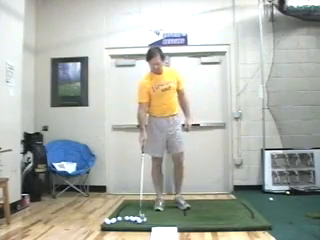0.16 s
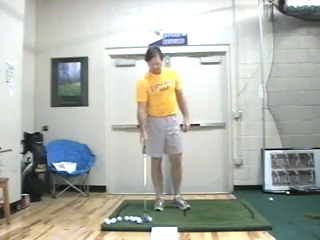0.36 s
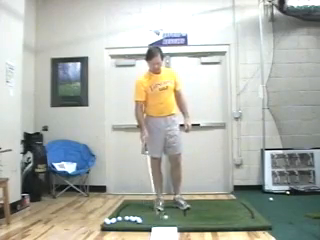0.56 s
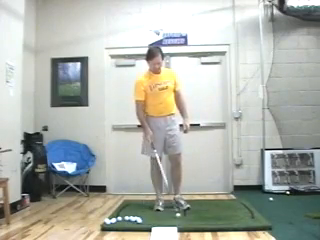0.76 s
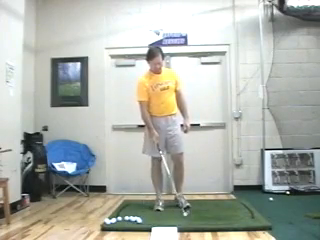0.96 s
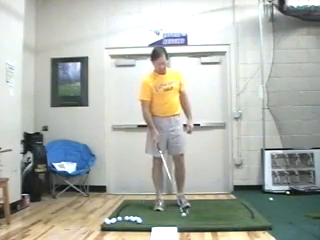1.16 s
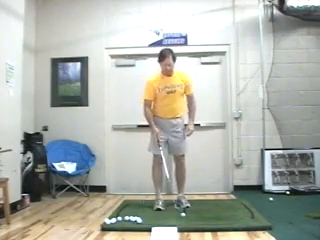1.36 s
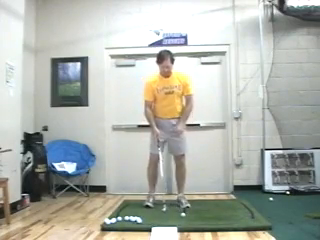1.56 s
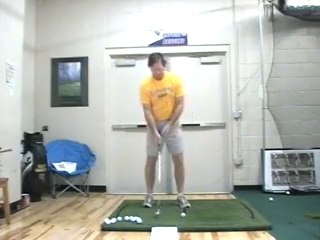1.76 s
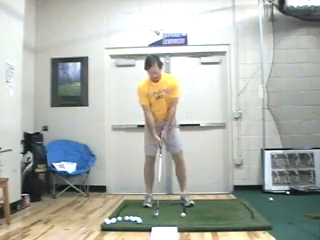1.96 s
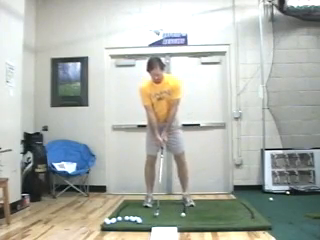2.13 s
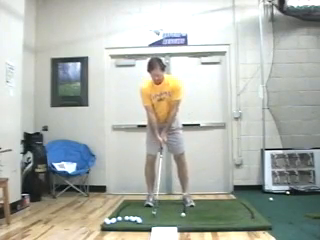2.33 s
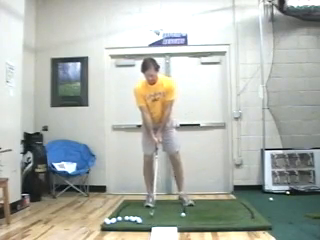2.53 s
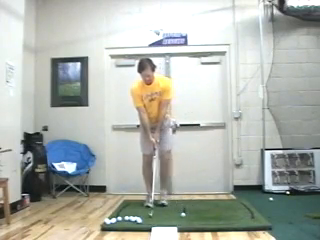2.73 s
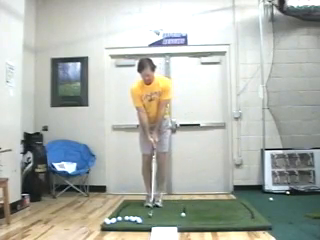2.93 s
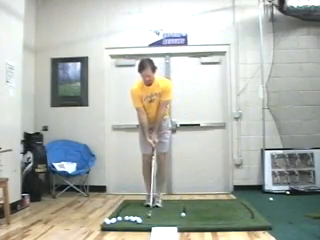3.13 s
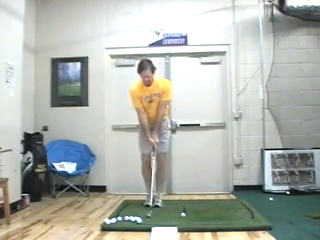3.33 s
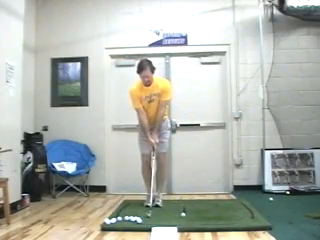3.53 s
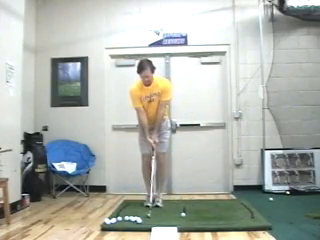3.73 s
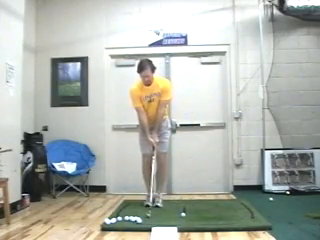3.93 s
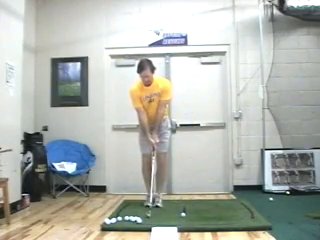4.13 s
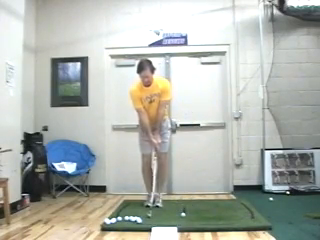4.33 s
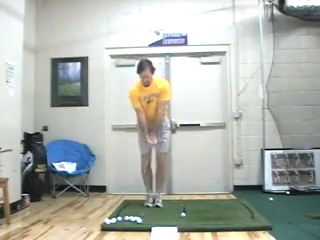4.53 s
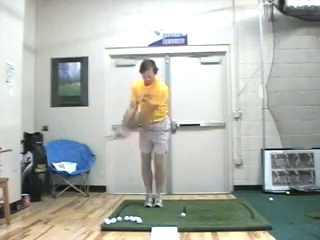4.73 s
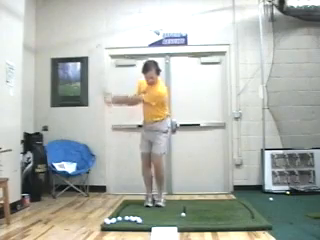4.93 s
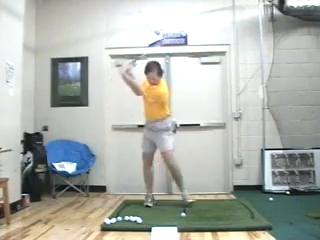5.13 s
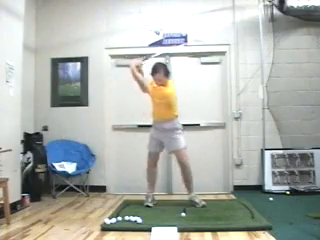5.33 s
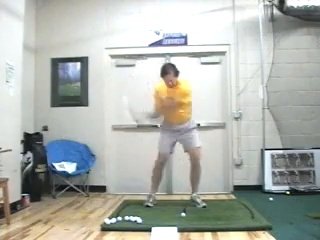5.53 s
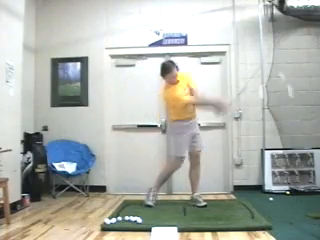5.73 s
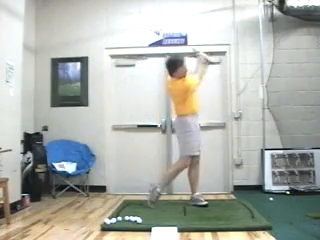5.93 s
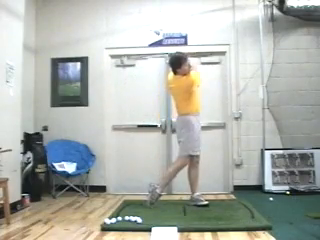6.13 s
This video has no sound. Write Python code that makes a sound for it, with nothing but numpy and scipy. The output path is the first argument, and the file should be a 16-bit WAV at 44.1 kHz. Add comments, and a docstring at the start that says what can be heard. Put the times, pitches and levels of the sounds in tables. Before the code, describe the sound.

A steady mains buzz and soft fan air fill a small hard-walled room. A few barely audible, gritty shoe and club touches on a mat come early, then only hum. Near the end a very brief swish leads into one loud, sharp golf crack with a metallic ring and quick echoes, followed by a low thud as the ball meets a net and a grainy rustle. Heard from a few metres away, nearly mono.

```python
"""A small hard-walled room with buzzing lamps and a fan, where a golfer hits one ball off a mat into a net.
Shoes and club tap the mat; the shaft sings and the head hisses on the way down; filtered noise bursts make
the crack, ringing sines the club, low sines the thuds; slow-dying grainy noise makes the net's rustle.
A tape camera with a narrow stereo microphone listens from a few metres away."""
import sys
import numpy as np
from scipy import signal
from scipy.fft import rfft, irfft, dct
from scipy.io import wavfile

SR = 44100
rng = np.random.default_rng(int(sys.argv[2]) if len(sys.argv) > 2 else 0)


def inscribe(sig):
    """Save sig as 16-bit PCM at rate SR to the path in sys.argv[1].

    A 1-D sig is mono; a 2-D sig holds one channel per row.
    Samples are clipped to [-1, 1] before scaling.
    """
    pcm = np.round(np.clip(np.atleast_2d(sig).T, -1, 1) * 32767)
    wavfile.write(sys.argv[1], SR, pcm.astype(np.int16))


N = 272538
T = np.arange(N) / SR  # time, s
STRIKE_S = 5.7472  # the face meets the ball

# colour of the crack and its early echoes: f/Hz, relative level per Hz/dB
CRACK_COLOUR = [(30, -25), (150, 5), (500, 2.5), (1100, -2.5), (2200, 7), (4200, -3.5), (7200, 2.5),
                (9200, -3), (11000, -15), (12500, -27)]


def undb(db):
    """Decibels to gain."""
    return 10 ** (np.asarray(db) / 20)


def unit(x):
    """Scale to rms 1."""
    return x / np.sqrt(np.mean(x ** 2))


def colour(x, points):
    """Filter by a spectrum of (Hz, dB) points, joined by straight lines over log frequency."""
    hz, db = np.transpose(points)
    f = np.maximum(np.arange(N) * SR / (2 * N), 1)
    gain = undb(np.interp(np.log(f), np.log(hz), db))
    return dct(dct(x, norm="ortho") * gain, type=3, norm="ortho")


def noise(points):
    """Unrelated mid and side noises of one colour, together of rms 1."""
    return unit(colour(rng.standard_normal((2, N)), points))


def walk(rate):
    """Smooth random curve of rms 1 with about `rate` turns a second."""
    f = np.fft.rfftfreq(N, 1 / SR)
    return unit(irfft(rfft(rng.standard_normal(N)) / (1 + (f / rate) ** 4), N))


def blow(start, rise, t60):
    """Envelope that rises at `start` and dies away by 60 dB in `t60` seconds."""
    age = np.maximum(T - start, 0)
    return (1 - np.exp(-age / rise)) * np.exp(-np.log(1000) * age / t60)


def tone(hz):
    """A sine of rms 1 with random phases in mid and side."""
    return np.sqrt(2) * np.sin(2 * np.pi * (hz * T + rng.random((2, 1))))


def strike(crack_db=-1, crack_t60=.012, brush_db=-2, brush_lead=0.0028, ring_db=-5):
    """The sole brushes the mat, then the face cracks on the ball; floor and walls repeat it and the club rings."""
    # the crack and its first reflections: delay/s, level before crack_db/dB
    paths = [(0, 4), (.0026, 1.5), (.0068, -7), (0.0117, -9), (0.0172, -18), (.034, -8.5), (.047, -17)]
    # modes of club head and shaft: f/Hz, level before ring_db/dB, t60/s
    club = [(1135, -17.5, 0.15), (1433, -36, 0.17), (2000, -31, 0.54), (2564, -29, 0.35),
            (2650, -17.5, 0.22), (2952, -33, 0.72), (4380, -42, 0.21), (6200, -32, .28), (6660, -27, .2),
            (6810, -22, 0.22), (7350, -22, 0.11)]
    brush = noise([(25, -30), (60, 0), (130, -5.0), (700, -4.5), (1500, -6), (4000, -14), (9000, -20),
                   (12000, -32)])
    brush *= undb(brush_db) * blow(STRIKE_S - brush_lead, rise=0.00095, t60=0.025)
    bursts = sum(undb(db) * blow(STRIKE_S + lag, rise=0.0003, t60=crack_t60) for lag, db in paths)
    crack = bursts * noise(CRACK_COLOUR)
    ring = sum(undb(db) * tone(hz) * blow(STRIKE_S, rise=0.00071, t60=t60) for hz, db, t60 in club)
    return brush + undb(crack_db) * crack + undb(ring_db) * ring


def swish(rough=0.34, wander=0.04):
    """Vortices off the shaft sing at a pitch that follows the club's speed; the head adds hiss."""
    # the club is fastest just before the ball, and its speed is a bell curve in time
    fastest_lead_s, swing_width_s = .019, .046
    # mean pitch at top speed; loudest at this lead before the ball, as the sole meets the mat
    sing_hz, sing_db, sing_lead_s = 569.4, -11, 0.0022
    swell_db_per_s, collapse_db_per_s = 700, 2600
    # hiss at top speed, and its fall for a tenfold drop in speed
    top_hiss_db, hiss_db_per_decade = -24.5, 62

    log_speed = -.5 * ((T - STRIKE_S + fastest_lead_s) / swing_width_s) ** 2
    pitch = sing_hz * np.exp(log_speed) * (1 + wander * walk(90))
    phase = 2 * np.pi * (np.cumsum(pitch) / SR + rng.random((2, 1)))
    eddies = noise([(100, -12), (230, -11), (500, 10), (800, -19), (2000, -29)])
    sing = np.sqrt(2) * np.sin(phase) + rough * eddies
    past_mat = T - STRIKE_S + sing_lead_s
    level_db = sing_db + np.minimum(swell_db_per_s * past_mat, -collapse_db_per_s * past_mat)

    hiss = noise([(100, -12), (260, 8.5), (480, 9.0), (800, -4), (1600, -0.5), (3300, -3), (5000, -10.5),
                  (7500, -9.5), (12000, -35)])
    hiss_db = top_hiss_db + hiss_db_per_decade * log_speed / np.log(10)
    return sing * undb(level_db) + hiss * undb(hiss_db)


def thuds(beat_db=1.5):
    """Mat and net take the blows and set the room's low modes booming; close modes beat unevenly."""
    # club on mat and ball in net: t/s, f/Hz, level before rise and beating/dB, rise/s, t60/s
    dull_blows = [(5.743, 128.5, -15, 0.0016, 0.37), (5.834, 98.7, -8.5, .014, 0.14),
                  (5.892, 85.7, -25, .012, 0.54)]
    boom = sum(undb(db) * np.sin(2 * np.pi * hz * (T - s)) * blow(s, rise, t60)
               for s, hz, db, rise, t60 in dull_blows)
    return np.array([boom, boom]) * undb(beat_db * walk(25))


def net(grain_db=2.0, flap_db=0.9, catch_s=5.835, catch_db=-22, catch_t60=0.27):
    """The ball drags into the mesh with a short hiss; the net swings on and its cords rub in small uneven slips."""
    # colour of the rustle: f/Hz, relative level per Hz/dB
    rustle = [(25, -24), (50, -10), (90, 12), (170, -3), (450, 5), (750, -2.5), (1250, -4.5), (2000, -1),
              (3000, -7.5), (4200, -16), (6500, -21), (9000, -37), (12000, -66)]
    # the net is shaken as it catches the ball and again as it swings back: t/s, level before rise/dB
    shakes = [(5.83, -31), (5.935, -26)]
    drag = noise([(25, -25), (80, -6), (200, 19), (400, -1), (1000, -27), (3000, -19), (7000, -6),
                  (12000, -27)])
    drag *= undb(catch_db) * blow(catch_s, rise=0.01, t60=catch_t60)
    # the two shakes add in power
    shaking = np.sqrt(sum((undb(db) * blow(s, rise=.026, t60=3.9)) ** 2 for s, db in shakes))
    slips = undb(grain_db * walk(300) + flap_db * walk(25))
    return drag + noise(rustle) * shaking * slips


def room(tail_db=-17.0, early_db=-20.0, early_t60=0.22):
    """Dense early echoes of the crack, then a tail that lasts longest in the bass."""
    # reverberation of the crack: f/Hz, relative level per Hz at its start/dB, t60/s
    hz, db, t60 = np.transpose([(91, 9, 1.7), (201, -7, 1.3), (416, 7.5, 0.76), (900, -3, 0.65),
                                (2200, -0.5, 0.62), (4200, -4.5, 0.65), (7000, -8, 0.71),
                                (8900, -13.5, 0.58), (12000, -28, .33)])
    spectrum = rfft(noise([(25, -25), *zip(hz, db)]))
    log_f = np.log(np.maximum(np.fft.rfftfreq(N, 1 / SR), 1))
    tail = 0
    for peak, decay in zip(np.eye(len(hz)), t60):
        # triangular bands that overlap and add up to the whole spectrum
        band = np.interp(log_f, np.log(hz), peak)
        tail = tail + irfft(spectrum * band, N) * blow(STRIKE_S, rise=0.0045, t60=decay)
    early = noise(CRACK_COLOUR) * blow(STRIKE_S, rise=0.0029, t60=early_t60)
    return undb(tail_db) * tail + undb(early_db) * early


def stance(grain_db=4):
    """Shoes and club touch the mat lightly; its bristles make the touch gritty."""
    # soft taps and shuffles while taking the stance: t/s, level before rise/dB
    taps = [(.428, -45), (1.075, -43), (1.405, -48), (1.735, -44), (2.19, -47)]
    scuff = noise([(100, -10), (400, 6), (2000, 1), (5000, -9), (9000, -8), (12000, -29)])
    scuff = unit(scuff * undb(grain_db * walk(200)))
    return scuff * sum(undb(db) * blow(s, rise=0.0016, t60=0.27) for s, db in taps)


def fan(air_db=-44.0, waver_db=1.7):
    """Steady moving air with a few wavering motor lines."""
    # motor whine: f/Hz, level about which it wavers/dB
    motor = [(866, -59), (926, -59.5), (1160, -69), (6743, -70), (7440, -74)]
    # colour of ventilation and hiss: f/Hz, relative level per Hz/dB
    air = [(15, -25), (30, -10), (45, -5), (80, -1.4), (115, -1.5), (180, -7), (400, -11.5), (1000, -16),
           (2300, -22.5), (4500, -25), (7200, -25), (10500, -34), (11500, -47)]
    whine = sum(tone(hz) * undb(db + waver_db * walk(2)) for hz, db in motor)
    return noise(air) * undb(air_db) + whine


def lamps(mains_hz=59.995, weak_db=-70, fall_db_per_khz=-1.85, scatter_db=4.0, waver_db=.5):
    """Mains buzz: strong partials over a weak comb, strongest at multiples of twice the mains frequency."""
    # strong partials: multiple of the mains frequency, level about which it wavers/dB
    strong = [(1, -50.5), (2, -47.5), (4, -57.5), (6, -50.5), (8, -49.5), (14, -52), (16, -56.5),
              (18, -63.5), (22, -54), (24, -64.5), (28, -64.5), (44, -63.5), (46, -67.5), (54, -61),
              (58, -60.1), (62, -60.5), (64, -66), (66, -61.5), (74, -63), (82, -62.5), (104, -59),
              (106, -59)]
    order = np.arange(180)
    above_4_khz = np.maximum(order * mains_hz / 1000 - 4, 0)
    db = weak_db + fall_db_per_khz * above_4_khz + scatter_db * rng.standard_normal(len(order))
    db = db - 11 * (order % 2)  # both half cycles buzz nearly alike
    for multiple, level_db in strong:
        db[int(round(multiple))] = level_db
    partials = (order > 0) * undb(db) * np.exp(2j * np.pi * rng.random((2, len(order))))
    # one mains cycle as a wavetable, read round and round
    size = 8192
    cycle = irfft(partials, size) * size / np.sqrt(2)
    place = (T * mains_hz % 1) * size
    buzz = np.array([np.interp(place, np.arange(size), c, period=size) for c in cycle])
    return buzz * undb(waver_db * walk(7.6))


def stereo(mid_side, side_gain):
    """Left and right from mid and side, the side scaled band by band."""
    mid, side = mid_side[0], colour(mid_side[1], side_gain)
    return np.array([mid + side, mid - side])


def scene():
    """The shot comes from straight ahead, the hum from all around."""
    # side gain of the shot by band: f/Hz, gain/dB
    shot_side = [(60, -12), (110, -15), (200, -18), (350, -19), (640, -18), (1160, -16), (2090, -15),
                 (3790, -15.5), (6840, -64), (12400, -22)]
    # side gain of the hum by band: f/Hz, gain/dB
    hum_side = [(60, -8), (110, -12), (200, -3), (350, -11), (640, -9.5), (1160, -6), (2090, -7),
                (3790, -11.5), (6840, -88), (12400, 1)]
    shot = stereo(strike() + swish() + thuds() + net() + room() + stance(), shot_side)
    hum = stereo(fan() + lamps(), hum_side)
    return (shot + hum) * undb([[-.2], [.2]])  # right slightly louder


def record(dry, notch_depth=0.81, notch_feedback=0.54):
    """The camera notches out the multiples of its head-drum rate, rounds the loudest peaks and cuts the top."""
    drum_hz, top_hz = 149.85, 12400
    size = N + SR // 4  # spare time keeps the echoes from wrapping round to the start
    # delay by one drum turn, fed back into a running average of past turns
    turn = np.exp(-2j * np.pi * np.fft.rfftfreq(size, 1 / SR) / drum_hz)
    repeating = (1 - notch_feedback) * turn / (1 - notch_feedback * turn)
    notched = irfft(rfft(dry, size) * (1 - notch_depth * repeating), size)[:, :N]
    rounded = np.tanh(notched * (1 + notch_feedback) / 2)
    top_cut = signal.ellip(8, .2, 80, top_hz, fs=SR, output="sos")
    return signal.sosfilt(top_cut, rounded)


dry = scene()
out = record(dry)
inscribe(out)
```